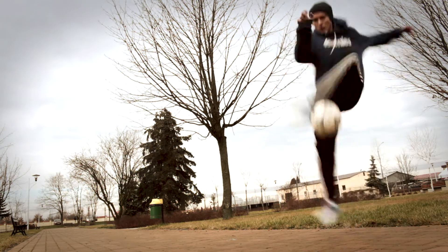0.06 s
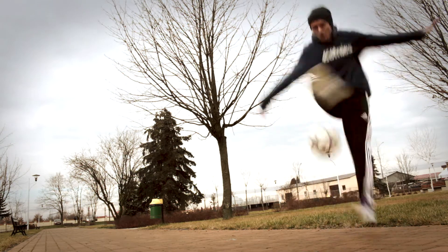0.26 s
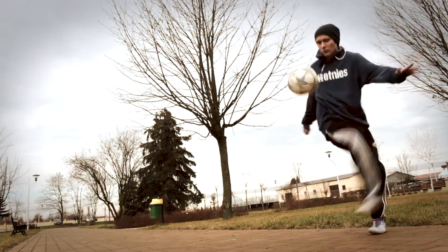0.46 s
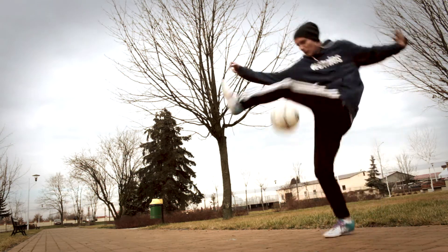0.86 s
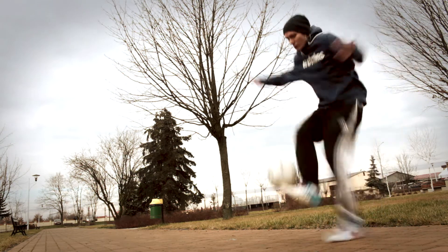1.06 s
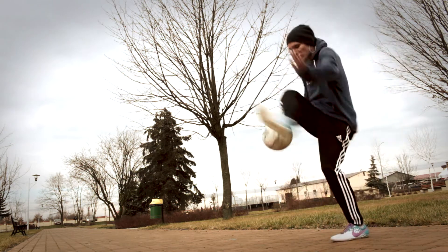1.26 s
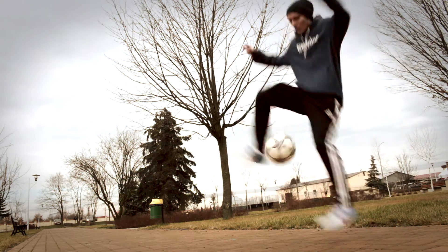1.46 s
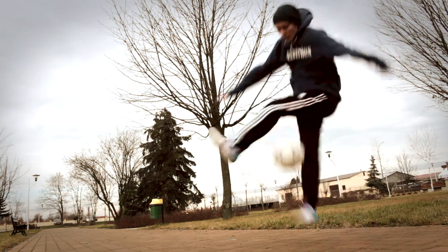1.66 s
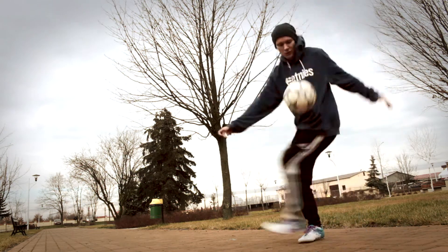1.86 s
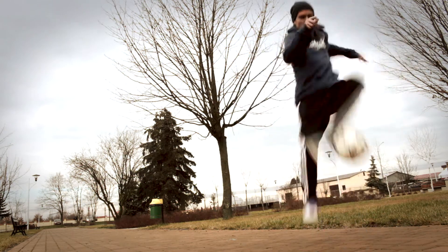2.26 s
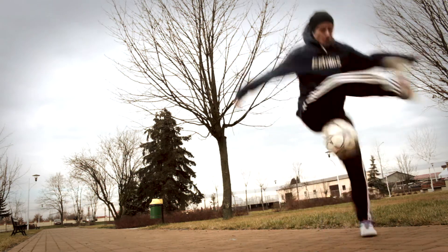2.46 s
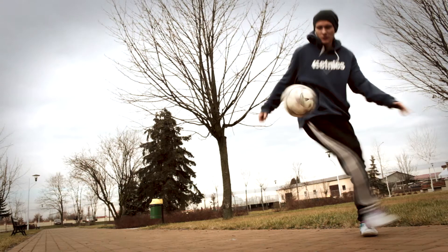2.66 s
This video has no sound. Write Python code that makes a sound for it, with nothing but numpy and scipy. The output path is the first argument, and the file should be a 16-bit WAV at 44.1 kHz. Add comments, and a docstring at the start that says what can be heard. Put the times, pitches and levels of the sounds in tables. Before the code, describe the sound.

A football is kicked four times, at about 0.2, 1.1, 1.6 and 2.4 seconds, each a dull thud with a tick and brief ring. Shoes slap on paving just after each kick, and more lightly near 0.6 and 1.9 seconds. Faint grit clicks and scuffs of soles and clothes fall between. Everything is a few metres away, slightly right, with faint echoes over a quiet park's low, distant rumble.

```python
"""On a paved path in a quiet park, a player juggles a football a few metres away, a little to the right.
Each kick is a dull thud as the ball is squashed, with a tick and a short ring from its casing.
Soft, dull knocks just after a kick are its early echoes; then the shoes slap on the paving, toe then heel.
In between, grit clicks and soles and clothes scuff. Trees and houses send back a faint tail of echoes
over a low, distant rumble."""
import sys
import numpy as np
from scipy import signal
from scipy.fft import rfft, irfft
from scipy.io import wavfile

SR = 44100
rng = np.random.default_rng(int(sys.argv[2]) if len(sys.argv) > 2 else 0)


def to_wav(sig):
    """Store sig (one row per channel, or 1-D mono) as 16-bit WAV at the path in sys.argv[1].

    Samples outside -1..1 are clipped; the rate is SR.
    """
    pcm = np.clip(np.atleast_2d(sig), -1, 1) * 32767
    pcm = np.round(pcm).astype(np.int16)
    wavfile.write(sys.argv[1], SR, pcm.T)  # frames by channels


N = 123479

# Foot meets ball: t/s, thud level/dB, thud f/Hz, thud delay/s, knock level/dB, knock f/Hz,
# ring level/dB, tick level/dB, tick f/Hz, sizzle level/dB, contact time/s, ground echo delay/s,
# release level/dB, sizzle width/octaves
KICKS = [(0.2357, -19.5, 144, 0.00463, -33.5, 463, -28, -29, 3180, -39.5, 0.0016, .00025, -39, 0.94),
         (1.0625, -33.5, 125, 0.0012, -33, 426, -27.5, -30, 4500, -68, 0.0004, 0.00021, -34, 1.8),
         (1.6406, -30, 108, 0.00094, -25, 364, -25.5, -35.5, 3900, -28, 0.00061, 0.00024, -44, 0.34),
         (2.3963, -21.5, 178, 0.00045, -27, 375, -27.5, -33, 5150, -45, 0.0018, .00023, -47.5, 1.1)]
# The notes of the ball's casing and the air inside: f/Hz, level/dB, time to fade by 60 dB/s
BALL_NOTES = [(560, -22, 0.054), (795, 8, 0.019), (1080, 11, 0.0096), (1463, -1.5, 0.027)]
# Shoes slap on the paving; the soft, dull knocks up to 40 ms after a kick are its early echoes:
# t/s, thud level/dB, thud f/Hz, slap level/dB, slap f/Hz, crack level/dB, crack f/Hz,
# sizzle level/dB, decay time/s
STEPS_AND_EARLY_ECHOES = [(0.2547, -55, 230, -45, 480, -63, 3500, -68, 0.0028),
                          (.2740, -37, 300, -64, 516, -67, 3000, -75, .001),
                          (0.3579, -23.5, 236, -18, 815, -21.5, 4950, -51, 0.00093),
                          (0.3713, -59, 300, -41, 1020, -61, 2580, -70, .001),
                          (0.3795, -24, 335, -30, 820, -44, 1980, -70, 0.00056),
                          (0.3895, -31, 135, -61, 500, -46, 4000, -63, 0.0086),
                          (0.6265, -31.5, 440, -27, 970, -61, 2220, -74, 0.00027),
                          (0.6354, -36.5, 214, -38, 860, -42.5, 2500, -65, 0.0086),
                          (0.6668, -40, 198, -36.5, 920, -47, 2520, -61, 0.0019),
                          (1.114, -25.5, 291, -21, 556, -28.5, 3340, -61, 0.0024),
                          (1.119, -23.5, 184, -29.5, 486, -34.5, 4200, -43, .003),
                          (1.1285, -26.5, 162, -33, 457, -39, 4500, -39.5, 0.0036),
                          (1.1379, -25, 330, -29, 880, -28.5, 2000, -64, 0.0016),
                          (1.1430, -26, 207, -22, 790, -64, 2600, -68, 0.0005),
                          (1.1594, -32, 207, -33.5, 920, -59, 2300, -68, 0.00092),
                          (1.1700, -37, 300, -42.5, 1440, -38.5, 1880, -72, 0.0014),
                          (1.6787, -30.5, 252, -43.5, 560, -52, 2980, -53, 0.0026),
                          (1.7670, -24, 332, -19, 685, -25.5, 4150, -67, 0.0018),
                          (1.7952, -31, 310, -32.5, 1030, -41, 2850, -67, 0.0029),
                          (1.9337, -35.5, 230, -40.5, 833, -45.5, 2780, -79, 0.0033),
                          (2.4300, -35.5, 230, -47, 504, -81, 3000, -82, .004),
                          (2.5057, -22, 407, -25.5, 970, -22.5, 3740, -31.5, 0.001),
                          (2.51, -25.5, 221, -58, 510, -60, 3500, -62, 0.0018),
                          (2.5153, -33, 206, -34, 1250, -44, 2580, -70, 0.0011)]
# Grit clicks under a shoe: t/s, level/dB, f/Hz
GRIT = [(0.1167, -52.5, 2380), (0.203, -55, 3120), (0.512, -50.5, 1320), (.7003, -44, 2600),
        (1.256, -49, 2040), (1.395, -55, 2490), (1.5846, -43, 3150), (1.8975, -43.5, 1300),
        (2.291, -54.5, 2660), (2.7160, -52.5, 2040)]
# Soles and clothes brush: middle t/s, half length/s, level/dB
SCUFFS = [(0.071, 0.0067, -49.5), (0.889, 0.01, -50), (0.932, 0.0073, -45.5), (1.142, 0.015, -43),
          (1.479, 0.0036, -49.5), (1.663, 0.0098, -47), (1.815, 0.0095, -42), (1.9, 0.032, -51.5),
          (1.959, 0.0053, -46), (2.029, 0.016, -43.5), (2.257, 0.011, -53), (2.707, 0.089, -58.5)]
# The tone of that brushing, from bass to treble: f/Hz, level/dB
SCUFF_COLOUR = [(300, -0.5), (900, 1.5), (3000, -0.5), (5000, -4.5), (9000, -8.5), (15000, -26)]
# How strongly the microphone picks up sound from the player's direction: f/Hz, level/dB
MICROPHONE = [(1000, -0.5), (2800, 1.5), (4000, -2), (4900, -4.5), (5700, -1.5), (7400, -8.5), (8600, -5.5),
              (12000, -5), (16000, -1)]
# How much louder the player is on the left than on the right: f/Hz, level/dB
BALANCE = [(200, 0.7), (900, -0.2), (2500, -1.5), (5000, -2.5), (12000, -2.5)]
# How strongly trees and houses send sound back: f/Hz, level/dB
ECHO_COLOUR = [(60, -18), (200, -16), (500, -20.5), (1200, -22), (3000, -12.5), (6000, -23), (14000, -43)]
# How long their echoes last: f/Hz, time to fade by 60 dB/s
ECHO_FADE = [(100, 0.18), (1000, 0.28), (4000, 0.32), (12000, 0.37)]
# The tone of the distant rumble: f/Hz, level/dB
RUMBLE_COLOUR = [(22, -18), (31, -22), (42, -2.5), (60, 2.5), (85, -4.5), (125, -4), (190, -9), (300, -10),
                 (430, -11.5), (650, -17), (1000, -20.5), (1600, -20), (2200, -26.5), (3300, -27.5),
                 (5000, -32.5), (8000, -36.5), (12000, -41.5), (16000, -49.5)]
# How alike left and right are in the echoes and the rumble: f/Hz, likeness (0 unrelated, 1 the same)
PARK_LIKENESS = [(100, .99), (500, 0.84), (1500, 0.44), (4000, 0.18), (12000, 0.067)]

LEVEL_WINDOW_S, HIT_LENGTH_S = .008, .08
GROUND_ECHO_SHARE = .7


def kicks():
    """The casing ticks, the ball knocks, rings and thuds as it is squashed; the paving echoes it all."""
    out, t = np.zeros(N), np.arange(N) / SR
    for (s, thud_db, thud_hz, thud_delay_s, knock_db, knock_hz, ring_db, tick_db, tick_hz,
         sizzle_db, contact_s, echo_s, release_db, sizzle_octaves) in KICKS:
        kick = np.zeros(N)
        tick = impact(tick_db, tick_hz, octaves=1.17, rough=1.0, decay_s=contact_s)
        add(kick, s, tick + sizzle(sizzle_db, contact_s, sizzle_octaves))
        knock = impact(knock_db, knock_hz, octaves=0.75, rough=0.26, decay_s=0.0071)
        add(kick, s, knock + from_db(ring_db) * ball_ring())
        release = impact(release_db, hz=4200, octaves=2.4, rough=3.4, decay_s=0.002)
        add(kick, s + .0046, release)   # the ball rubs the shoe again as it leaves
        thud = impact(thud_db, thud_hz, octaves=2, rough=.15, decay_s=0.01)
        add(kick, s + thud_delay_s, thud)
        push = impact(db=-37.5, hz=74.6, octaves=0.64, rough=0.19, decay_s=0.0056)
        add(kick, s + 0.0032, push)   # the whole ball pushes the air
        ground_echo = GROUND_ECHO_SHARE * np.interp(t - echo_s, t, kick)
        out += (kick + ground_echo) / np.hypot(1, GROUND_ECHO_SHARE)
    return out


def ball_ring():
    """The ball's own notes die away quickly; it is struck a little differently each time."""
    t = np.arange(int(HIT_LENGTH_S * SR)) / SR
    ring = 0
    for hz, db, fade_s in BALL_NOTES:
        fade = from_db(db + rng.normal(0, 0.5) - 60 * t / fade_s)
        ring += fade * np.sin(2 * np.pi * hz * t)
    return unit_energy(ring)


def steps_and_early_echoes():
    """Shoes slap on the paving; soft, dull knocks just after a kick are its early echoes."""
    out = np.zeros(N)
    for (s, thud_db, thud_hz, slap_db, slap_hz,
         crack_db, crack_hz, sizzle_db, decay_s) in STEPS_AND_EARLY_ECHOES:
        crack = impact(crack_db, crack_hz, octaves=1.6, rough=0.72, decay_s=decay_s)
        crack += sizzle(sizzle_db, decay_s, octaves=0.49)
        slap = impact(slap_db, slap_hz, octaves=1.406, rough=0.71, decay_s=decay_s + 0.0017)
        thud = impact(thud_db, thud_hz, octaves=1.56, rough=0.48, decay_s=0.0053)
        add(out, s, crack + slap + thud)
    return out


def grit():
    """Loose grains make small, dry clicks under a shoe."""
    out = np.zeros(N)
    for s, db, hz in GRIT:
        add(out, s, impact(db, hz, octaves=1.19, rough=0.47, decay_s=0.0029))
    return out


def scuffs():
    """Soles and clothes rub in short swells of grainy noise."""
    t = np.arange(N) / SR
    rubbing = grainy(rng.standard_normal(N), grain_db=4.5)
    swells = sum(from_db(db) * np.exp(-((t - s) / half_s) ** 2 / 2) for s, half_s, db in SCUFFS)
    return coloured(rubbing, SCUFF_COLOUR) * swells


def park_echoes(player):
    """Trees and houses scatter the sound into many tiny echoes: a faint hiss whose bass fades first."""
    t = np.arange(SR // 2) / SR
    rise = 1 - np.exp(-(t / 0.012) ** 2)
    noises = (park_noise(), park_noise())   # neighbouring bands use different noise
    tail = 0
    for k, hz in enumerate(85 * 2. ** np.arange(8)):
        fade = unit_energy(rise * from_db(-60 * t / at_hz(ECHO_FADE, hz)))
        # each sound in this band leaves a fading trail of power behind it
        power = np.abs(signal.fftconvolve(band(player, hz, octaves=1) ** 2, fade ** 2)[:N])
        hiss = band(grainy(noises[k % 2], grain_db=2), hz, octaves=0.87)
        tail += from_db(at_hz(ECHO_COLOUR, hz)) * np.sqrt(power) * hiss / hiss.std()
    return tail


def distant_rumble():
    """The park's steady background: quiet noise, strongest in the deep bass."""
    return from_db(-49) * coloured(park_noise(), RUMBLE_COLOUR)


def park_noise():
    """Even noise for left and right, nearly the same in the bass and unlike in the treble."""
    shared, side = rfft(rng.standard_normal((2, N)))
    likeness = at_hz(PARK_LIKENESS, np.fft.rfftfreq(N, 1 / SR))
    opposite = side * [[1], [-1]]
    return irfft(np.sqrt((1 + likeness) / 2) * shared + np.sqrt((1 - likeness) / 2) * opposite, N)


def impact(db, hz, octaves, rough, decay_s):
    """One hit around hz: a clean pulse plus a dying shudder of noise, as strong as rough says."""
    size = int(HIT_LENGTH_S * SR)
    t = np.arange(size) / SR
    shudder = rng.standard_normal(size) * np.exp(-t / decay_s) * (1 - np.exp(-2 * t / decay_s))
    shudder = irfft(np.exp(1j * np.angle(rfft(shudder, 2 * size))))[:size]   # even out all pitches
    shudder *= np.exp(-t / (10 * decay_s))
    shudder = unit_energy(band(shudder, hz, octaves))
    pulse = unit_energy(band(1. * (t == 0), hz, octaves))
    return from_db(db) * unit_energy(pulse + rough * shudder)


def sizzle(db, decay_s, octaves):
    """The brightest edge of a hit."""
    return -impact(db, hz=9600, octaves=octaves, rough=0.53, decay_s=decay_s)


def add(track, s, sound):
    """Add a hit at s seconds; an energy of one counts as 0 dB over the level window."""
    start = int(s * SR)
    track[start:start + len(sound)] += (sound * np.sqrt(LEVEL_WINDOW_S * SR))[:N - start]


def band(x, hz, octaves):
    """Keep the pitches around hz, in a band this many octaves wide."""
    half = 2 ** (octaves / 2)
    edges = [hz / half, min(hz * half, .45 * SR)]
    return signal.sosfilt(signal.butter(2, edges, "band", fs=SR, output="sos"), x + 1e-18)


def grainy(noise, grain_db):
    """Boost each sample by a random amount, so a few stand out as grains."""
    return noise * from_db(grain_db * np.minimum(rng.exponential(1, N), 5))


def filtered(x, table):
    """Turn each frequency up or down as the table says."""
    return irfft(rfft(x) * from_db(at_hz(table, np.fft.rfftfreq(N, 1 / SR))), N)


def coloured(noise, table):
    """Give noise the table's tone and an average strength of one."""
    shaped = filtered(noise, table)
    return shaped / shaped.std()


def at_hz(table, hz):
    """Read between a table's rows, giving every octave the same room."""
    row_hz, values = np.transpose(table)
    return np.interp(np.log(np.maximum(hz, 1)), np.log(row_hz), values)


def from_db(db):
    """Turn decibels into a number to multiply by."""
    return 10 ** (np.asarray(db) / 20)


def unit_energy(x):
    """Scale a sound so its squared samples add up to one."""
    return x / np.sqrt(np.sum(x ** 2) + 1e-20)


def to_the_right(x, left_lag_s=.000032):
    """Sound from the right reaches the left microphone later and, in the treble, weaker."""
    hz = np.fft.rfftfreq(N, 1 / SR)
    pan = from_db(at_hz(BALANCE, hz) / 2)
    lag = np.exp(-2j * np.pi * hz * left_lag_s)
    return irfft(rfft(x) * np.array([pan * lag, 1 / pan]), N)


def scene():
    """The player, the park's echoes and the distant rumble together."""
    player = kicks() + steps_and_early_echoes() + grit() + scuffs()
    nearby = to_the_right(filtered(player, MICROPHONE))
    return nearby + park_echoes(player) + distant_rumble()


def record(dry, cutoff_hz=16200):
    """Cut away the very highest treble steeply."""
    return signal.sosfilt(signal.ellip(10, .1, 80, cutoff_hz, fs=SR, output="sos"), dry)


dry = scene()
out = record(dry)
to_wav(out)
```